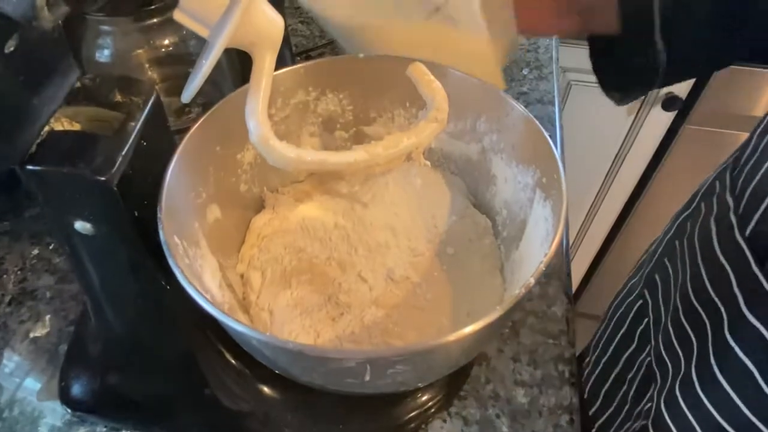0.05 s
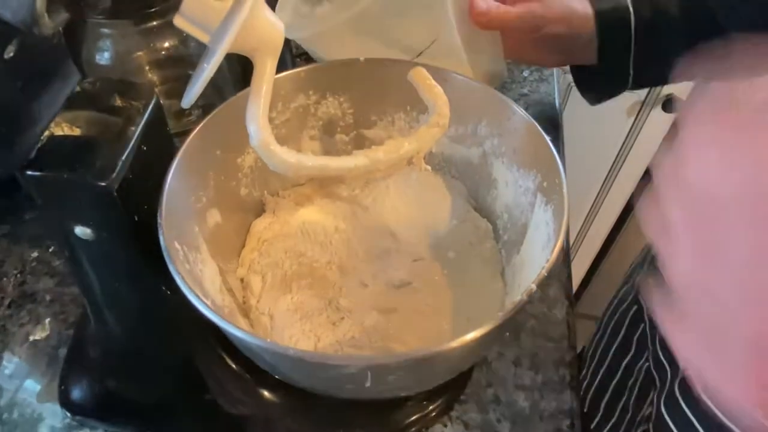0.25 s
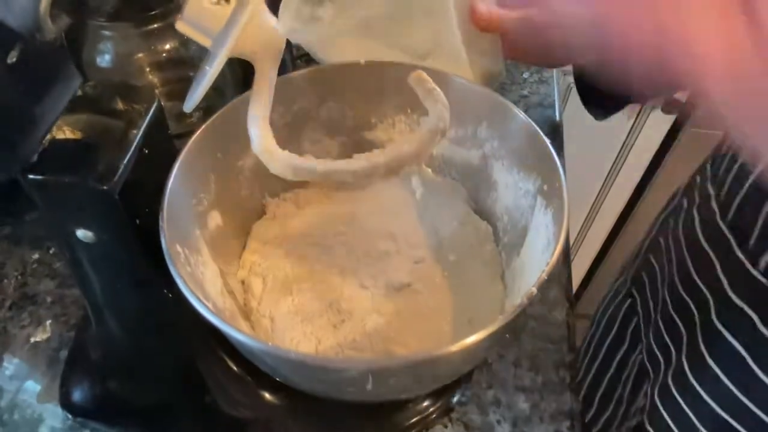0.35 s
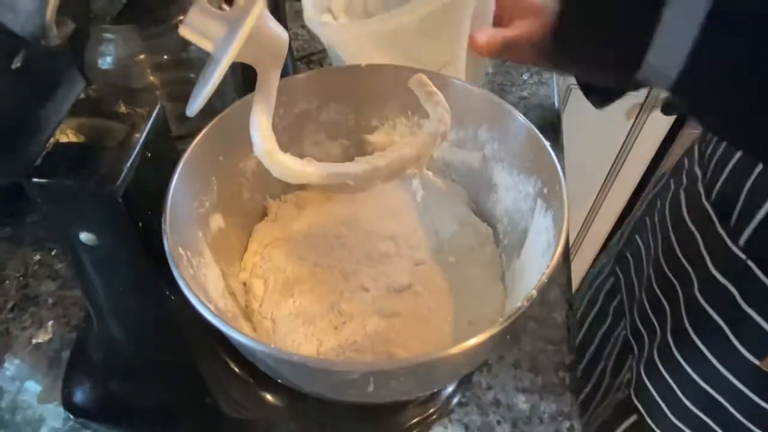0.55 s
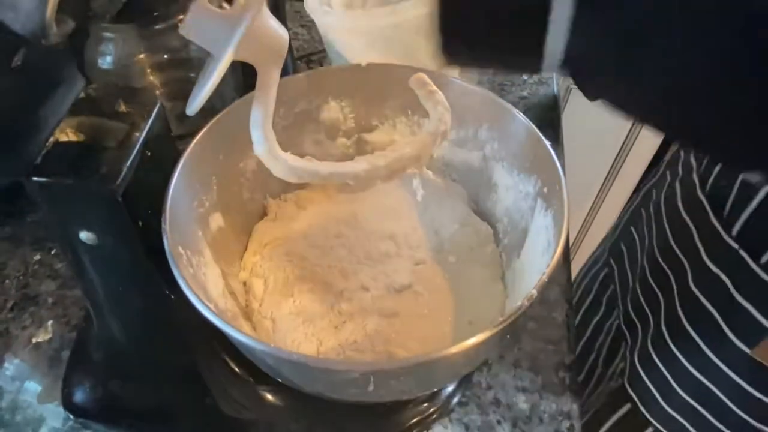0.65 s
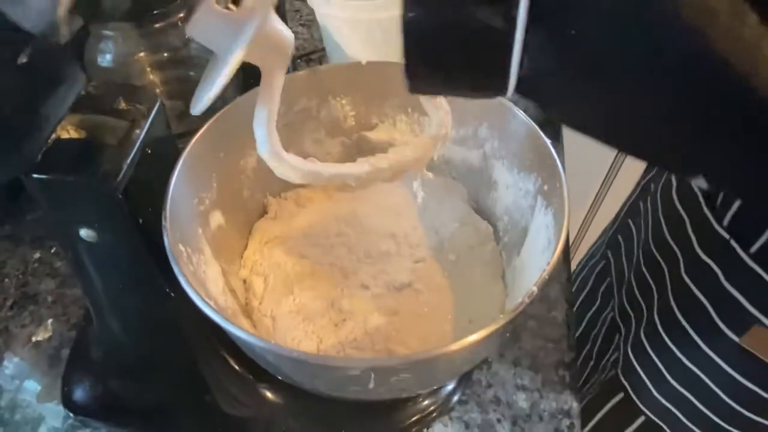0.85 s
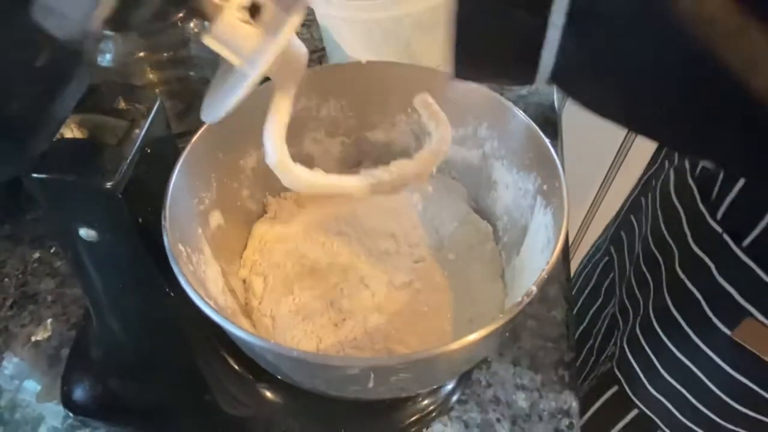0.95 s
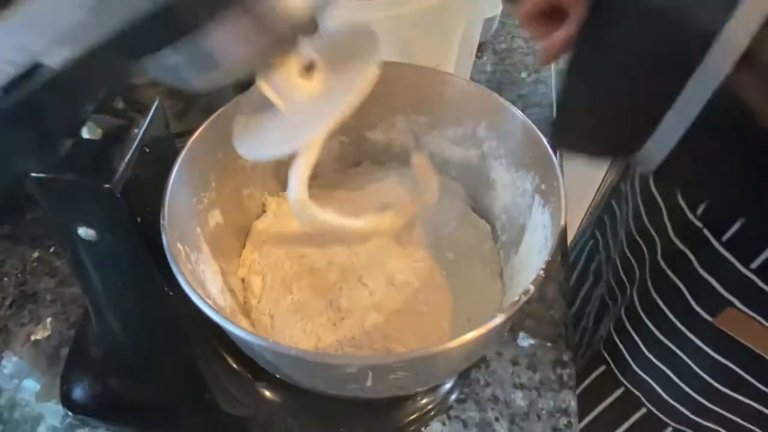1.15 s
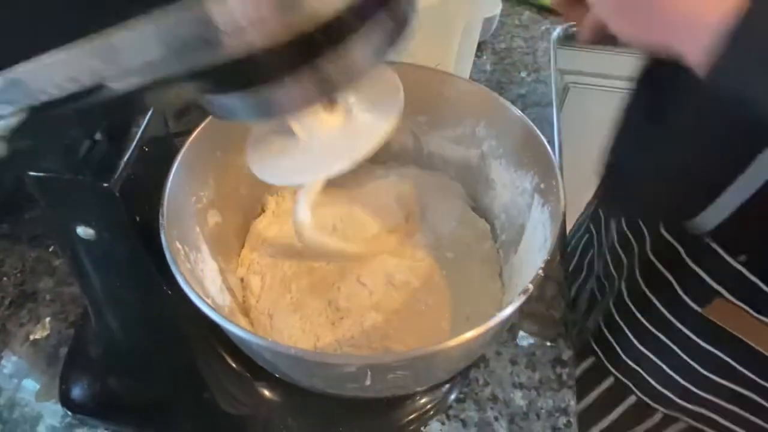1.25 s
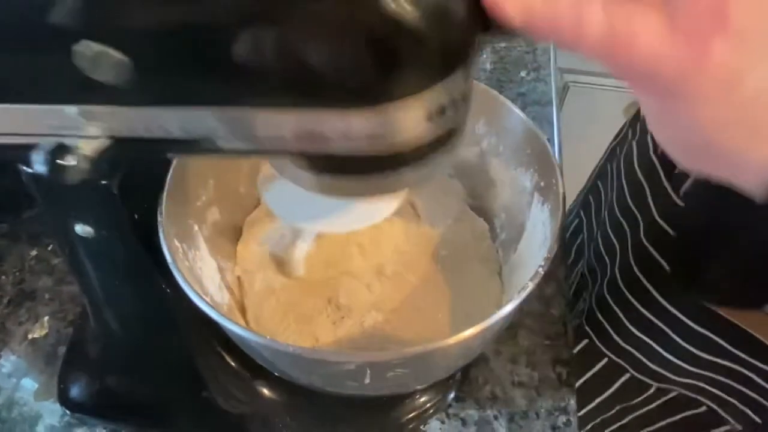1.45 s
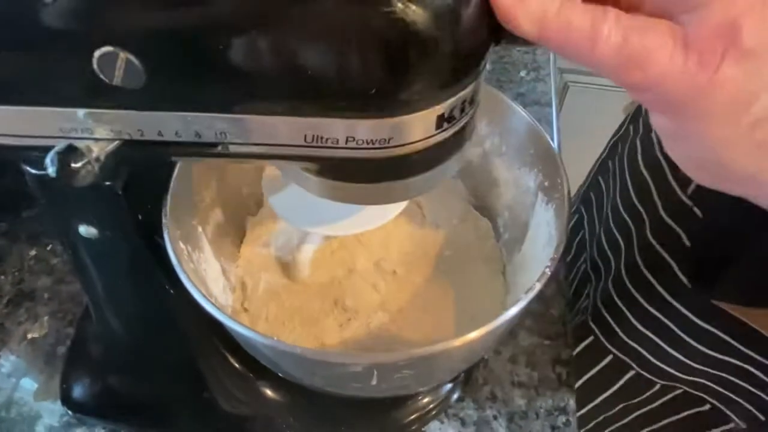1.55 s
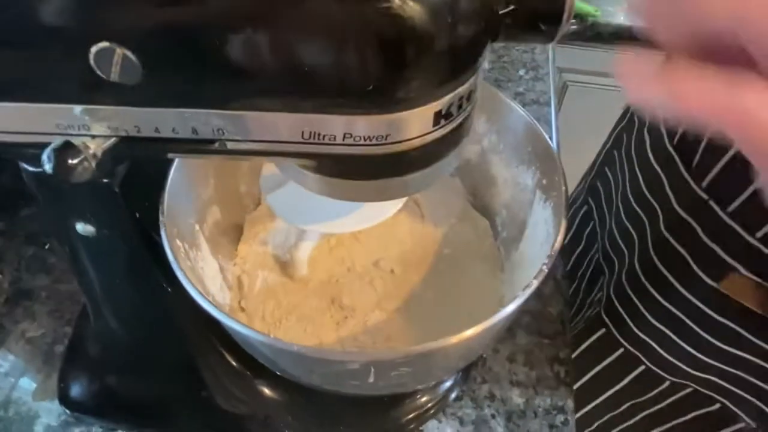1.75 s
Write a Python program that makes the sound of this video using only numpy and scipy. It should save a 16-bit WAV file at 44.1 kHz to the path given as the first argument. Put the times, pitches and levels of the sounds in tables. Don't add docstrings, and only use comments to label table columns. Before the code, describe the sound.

A heavy mixer head drops onto its seat with a hard metallic clack and thump

```python
import sys
import numpy as np
from scipy import signal
from scipy.fft import rfft, irfft
from scipy.io import wavfile
from scipy.ndimage import uniform_filter1d

SR = 44100
rng = np.random.default_rng(int(sys.argv[2]) if len(sys.argv) > 2 else 0)


def decibels_to_gain(level_db):
    exponent = np.asarray(level_db, float) / 20
    return 10 ** exponent


def store_pcm(level_fs):
    pcm = np.round(np.clip(level_fs, -1, 1) * 32767).astype(np.int16)
    wavfile.write(sys.argv[1], SR, np.atleast_2d(pcm).T)


N = 79380
PORT_SIGN = np.array([[1], [-1]])
LIKE_HZ = 384


def curve(table, at, log=False):
    x, y = np.array(table, float).T[:2]
    if log:
        return np.interp(np.log(at), np.log(x), y)
    return np.interp(at, x, y)


def unit(x):
    return x / np.sqrt(np.mean(x ** 2))


def band(x, hz, width):
    return signal.lfilter(*signal.iirpeak(min(hz, 0.45 * SR), hz / width, fs=SR), x)


def port_spread(hz):
    return hz ** 2 / (hz ** 2 + LIKE_HZ ** 2)


def noise_pair(colour=((1, 0), (20000, 0))):
    side_floor = 0.26
    hz = np.arange(N // 2 + 1) * SR / N + 1
    mid, side = rfft(rng.standard_normal((2, N)))
    both = mid + PORT_SIGN * side * (side_floor + port_spread(hz))
    return unit(irfft(both * decibels_to_gain(curve(colour, hz, True)), N))


def walk(rate):
    hold = int(SR / rate)
    steps = np.repeat(rng.standard_normal(N // hold + 1), hold)
    return 1.3 * uniform_filter1d(uniform_filter1d(steps, hold), hold)[:N]


def ring(at, db, hz, t60, turn=0., late=0.):
    t = np.maximum(np.arange(N) / SR - at - late / hz, 0)
    swell = 1 - np.exp(-(t * hz) ** 2)
    phase = turn * port_spread(hz) * PORT_SIGN
    return -decibels_to_gain(db - 60 * t / t60) * swell * np.sin(2 * np.pi * hz * t + phase)


def struck(hits, modes, late):
    level_spread_db, pitch_spread, port_turn_rad = 2.25, 0.018, 2.35
    out = 0
    for at, hit_db, contact_s in hits:
        chances = rng.standard_normal((3, len(modes)))
        for (hz, mode_db, t60), louder, sharper, turned in zip(modes, *chances):
            db = hit_db + mode_db + level_spread_db * louder
            mode = ring(at, db, hz * (1 + pitch_spread * sharper), t60, port_turn_rad * turned / 2, late)
            out = out + mode / (1 + (hz * contact_s) ** 2)
    return out


def clatter(hits, db, t60, colour):
    t = np.arange(N) / SR
    _, first_db, first_contact_s = hits[0]
    level = 0
    for at, hit_db, contact_s in hits:
        decay = decibels_to_gain(hit_db - first_db - 60 * np.maximum(t - at, 0) / t60)
        onset = np.clip((t - at) / contact_s / 2, 0, 1)
        level = level + decay * onset * first_contact_s / contact_s
    return decibels_to_gain(db) * level * noise_pair(colour)


def air():
    # Hz, level in dB per Hz.
    colour = [(15, -21), (30, -22.5), (55, 0), (120, -6), (400, -5.5), (800, -15.5), (3000, -32),
              (15000, -65)]
    return decibels_to_gain(-54) * noise_pair(colour)


def hum_lines():
    # Hz, level in dB, width in Hz.
    hum_bands = [(176, -60, 17.6), (357.4, -66, 13)]
    # seconds, level in dB.
    tone_swell = [(0, -68.5), (.4, -56), (.55, -63.5), (.62, -63.5), (.72, -67.5), (.9, -52.5), (1.1, -58),
                  (1.4, -60), (1.8, -61.5)]
    tone_hz, tone_db = 58, -56.5
    hum = 0
    for hz, db, width in hum_bands:
        noise = band(band(rng.standard_normal(N), hz, width), hz, width)
        hum = hum + decibels_to_gain(db + 0.5 * walk(2)) * unit(noise)
    swell = decibels_to_gain(curve(tone_swell, np.arange(N) / SR) - np.mean(np.array(tone_swell)[:, 1]))
    cycles = np.cumsum(tone_hz * (1 + 0.023 * walk(13))) / SR
    return hum + decibels_to_gain(tone_db) * np.sin(2 * np.pi * cycles) * swell


def sleeves():
    # seconds, level in dB.
    moves = [(0, -71), (.04, -80.5), (.1, -85.5), (.19, -83), (.22, -75.5), (.45, -73), (.66, -72.5),
             (.75, -70), (.81, -85.5), (.88, -75), (.97, -91), (1.03, -77.5), (1.12, -71), (1.3, -74.5),
             (1.4, -84), (1.6, -72.5), (1.8, -69.5)]
    # Hz, level in dB.
    colour = [(500, 1), (1500, 3.5), (3000, -9), (6000, -10.5), (9000, -17.5), (12000, -11.5),
              (15000, -20.5)]
    cloth_db, flicker_db = 8, 1
    level = decibels_to_gain(cloth_db + curve(moves, np.arange(N) / SR) + flicker_db * walk(17))
    return level * noise_pair(colour)


def ticks():
    # start in seconds, level in dB, pitch in Hz, t60 in seconds.
    small_ticks = [
        (.003, -55.5, 2590, .04),
        (0.058, -55.5, 2790, 0.023),
        (.348, -48.5, 2100, 0.01),
        (0.551, -36, 300, 0.0073),
        (.7384, -15.5, 960, 0.009),
        (0.897, -65, 4040, 0.041),
        (1.175, -57.5, 2180, 0.034),
        (1.276, -26.5, 355, 0.02),
        (1.321, -40.5, 393, 0.11),
        (1.397, -36, 178, 0.063),
    ]
    return sum(ring(*row, turn=0.13) for row in small_ticks)


def tub():
    # start in seconds, strength in dB, contact time in seconds.
    hits = [
        (.204, -5, 0.00067),
        (.228, -15, .002),
        (.262, -23, 0.0016),
    ]
    # Hz, level in dB, t60 in seconds.
    modes = [(58.7, -16, .2), (98.7, -13, 0.16), (186, 4, 0.052), (208.3, -16, .12), (321.6, -4, 0.04),
             (423, -14.5, 0.051), (367, -11, 0.029), (576.5, -10, 0.03), (830, -20, 0.0067)]
    rattle = -36, 0.055, [(300, 2.5), (1000, 7.5), (2400, -4), (4000, -22), (14000, -41)]
    return struck(hits, modes, late=0.38) + clatter(hits, *rattle)


def scuff():
    # Hz, level in dB.
    colour = [(700, -11), (1500, 2), (2900, -3.5), (3700, -2), (4300, -11), (6800, -13), (8500, -22.5),
              (15000, -27)]
    start_s, length_s = 0.553, 0.036
    t = np.arange(N) / SR - start_s
    fade = np.clip(np.minimum(t * 300, (length_s - t) * 150), 0, 1)
    return decibels_to_gain(-58) * fade * noise_pair(colour)


def lever():
    # start in seconds, strength in dB, contact time in seconds.
    hits = [
        (.738, -33.5, 0.000063),
        (.7425, -14.5, 0.0013),
        (.765, -43, 0.0013),
    ]
    # Hz, level in dB, t60 in seconds.
    modes = [(219, -12.5, 0.072), (300, 0.5, 0.047), (416, -19.5, 0.063), (484, -3.5, 0.095),
             (536, 3.5, 0.044), (680, -1, 0.02), (1010, -40, 0.014), (1383, -6, 0.04)]
    rattle = -28.5, .03, [(300, 7.5), (900, 8.5), (2200, -5), (4500, -19), (14000, -54)]
    return struck(hits, modes, late=0.067) + clatter(hits, *rattle)


def head():
    # start in seconds, strength in dB, contact time in seconds.
    seat_hits = [
        (1.4372, -10, 0.00035),
        (1.4412, -17, 0.000092),
        (1.447, -22, 0.00015),
        (1.457, -28, 0.00014),
        (1.477, -33, 0.00013),
        (1.484, -19.5, 0.0009),
        (1.501, -31.5, 0.00046),
    ]
    base_hits = [
        (1.442, -15, 0.0018),
        (1.452, -9.5, 0.0052),
        (1.479, -18, 0.00067),
        (1.503, -21.5, 0.001),
        (1.522, -25, 0.0015),
        (1.597, -31.5, 0.011),
    ]
    # Hz, level in dB, t60 in seconds.
    seat_modes = [(312.5, -5, 0.055), (600, -1, 0.026), (675, -8, 0.056), (940, 0.5, 0.026),
                  (1006, -7, 0.045), (1272, -16.5, 0.064), (1500, -12, 0.023), (1680, -4, 0.034),
                  (1860, -4.5, 0.048), (2211, -19.5, 0.21), (2500, -41, 0.11), (3347, -7, .03),
                  (3950, -15, .06)]
    base_modes = [(48.8, -11.5, 0.43), (61.6, 0.5, .2), (87.8, -3, 0.092), (159, -3.5, 0.11),
                  (174.5, 2.5, 0.072), (300, -13, 0.23), (417.4, -7.5, 0.2), (528.3, 2, 0.061)]
    rattle = -17.5, 0.035, [(300, 8), (1000, 1), (2200, -2), (4000, -11.5), (7000, -21), (10000, -26),
              (15000, -33.5)]
    late = 0.07
    slide_s, slide_db = 0.0039, -25.5
    crack_hz, crack_db, crack_t60_s = 9000, -30, 0.014

    t = np.arange(N) / SR - seat_hits[0][0]
    hiss = noise_pair()
    scrape = band(hiss, 850, 200) + 2.1 * band(hiss, 1800, 430) + 0.12 * band(hiss, 2900, 500)
    slide = decibels_to_gain(slide_db) * np.exp(np.minimum(t, 0) / slide_s) * (t < 0) * unit(scrape)
    crack_level = decibels_to_gain(crack_db - 60 * np.maximum(t, 0) / crack_t60_s) * (t > 0)
    crack = crack_level * unit(band(hiss, crack_hz, 12000))
    seat = struck(seat_hits, seat_modes, late) + clatter(seat_hits, *rattle)
    return slide + crack + seat + struck(base_hits, base_modes, late)


def room():
    # Hz, t60 in seconds.
    decay = [(60, 0.39), (250, 0.27), (1000, .3), (4000, 0.29), (12000, 0.15)]
    delay_s, fill_s = 0.0077, 0.0028
    t = np.arange(SR // 2) / SR
    noise, out = noise_pair()[:, :len(t)], 0
    for hz in 40 * 2 ** np.arange(0, 9, 0.5):
        t60 = curve(decay, hz, True)
        out = out + band(noise, hz, hz / 3) * decibels_to_gain(-60 * t / t60) / np.sqrt(t60)
    out = out * np.clip((t - delay_s) / fill_s, 0, 1)
    return out / np.sqrt(np.sum(out ** 2) / 2)


def scene():
    room_db = {"tub": -9, "lever": -6, "head": -8.5}
    left_db = 0.46
    parts = {"tub": tub(), "lever": lever() + ticks() + scuff(), "head": head()}
    sent = sum(decibels_to_gain(room_db[name]) * sound for name, sound in parts.items())
    wet = signal.fftconvolve(sent, room(), axes=1)[:, :N]
    direct = sum(parts.values()) * decibels_to_gain(PORT_SIGN * left_db / 2)
    return direct + wet + air() + hum_lines() + sleeves()


def low_pass(x):
    return signal.sosfilt(signal.butter(12, 15480, fs=SR, output="sos"), x)


def record(dry):
    mono_hz, flip_hz, top_leak_db = 10900, 13900, -12
    hz = np.arange(N // 2 + 1) * SR / N
    bass_cut = signal.butter(2, 38, "high", fs=SR, output="sos")
    left, right = signal.sosfilt(bass_cut, dry)
    mid = rfft(left + right) / 2 * np.where(hz < flip_hz, 1, decibels_to_gain(top_leak_db))
    side = rfft(left - right) / 2 * ((hz < mono_hz) | (hz > flip_hz))
    return low_pass(irfft(np.array([mid + side, mid - side]), N))


dry = scene()
out = record(dry)
store_pcm(out)
```